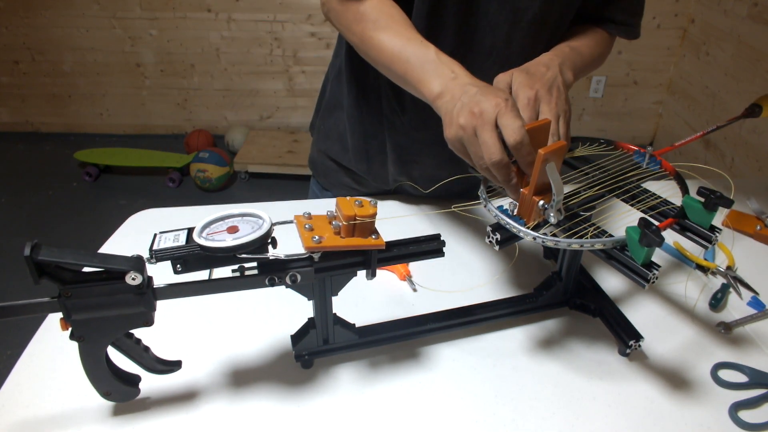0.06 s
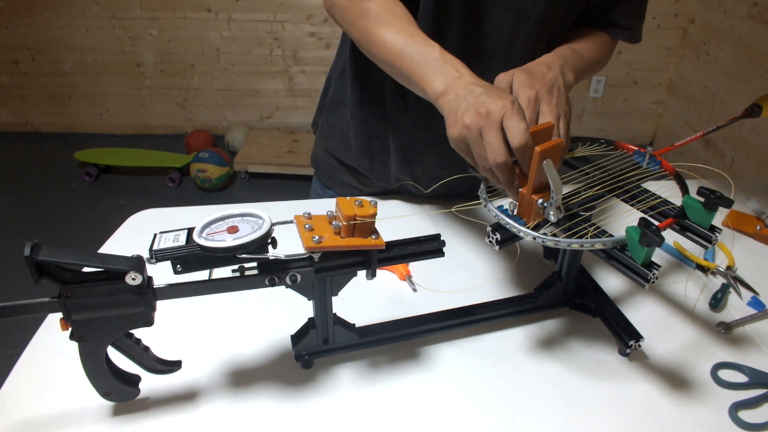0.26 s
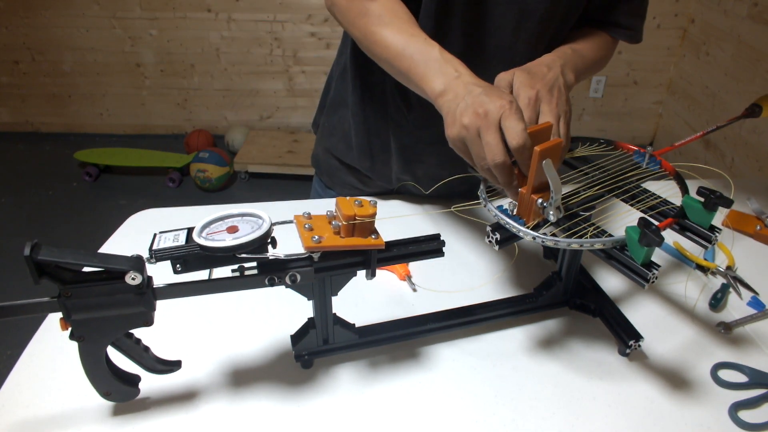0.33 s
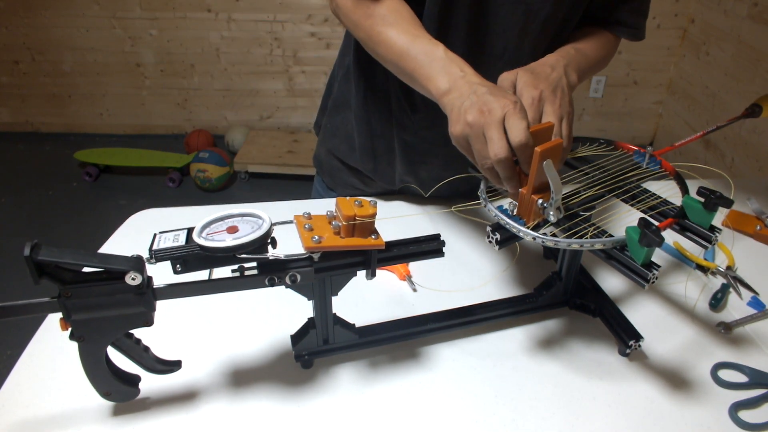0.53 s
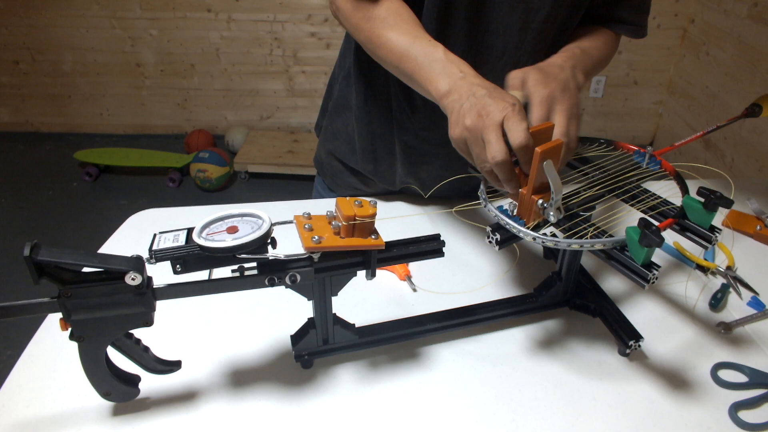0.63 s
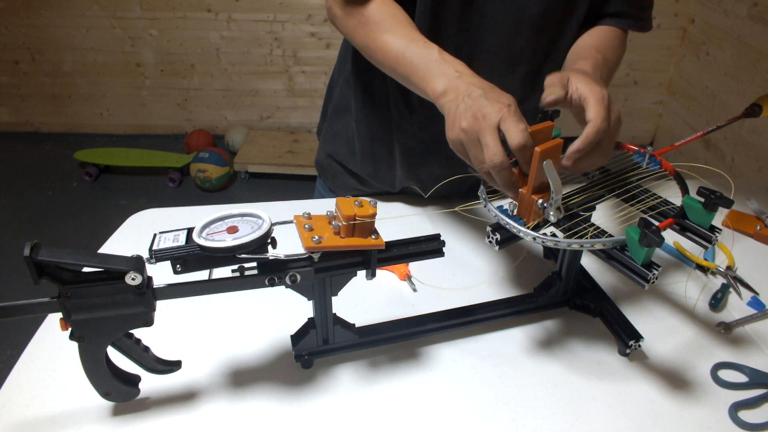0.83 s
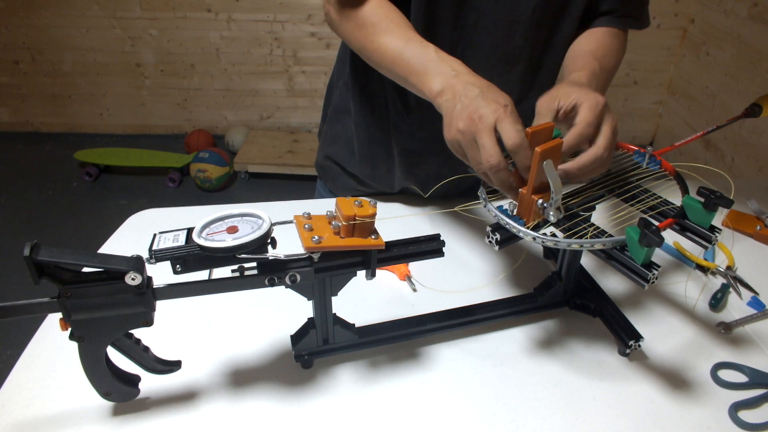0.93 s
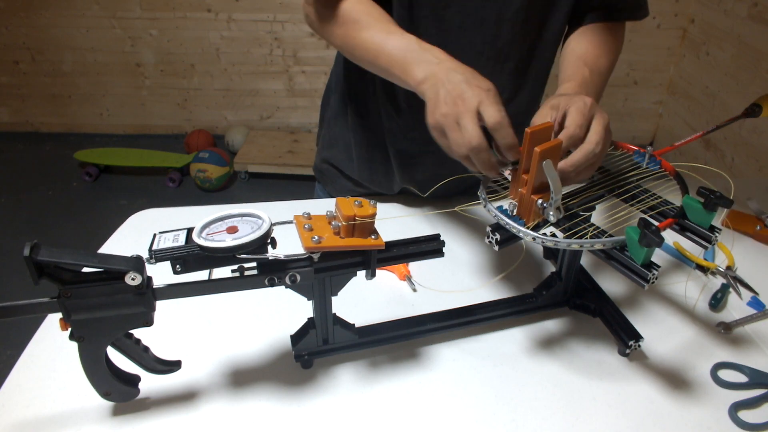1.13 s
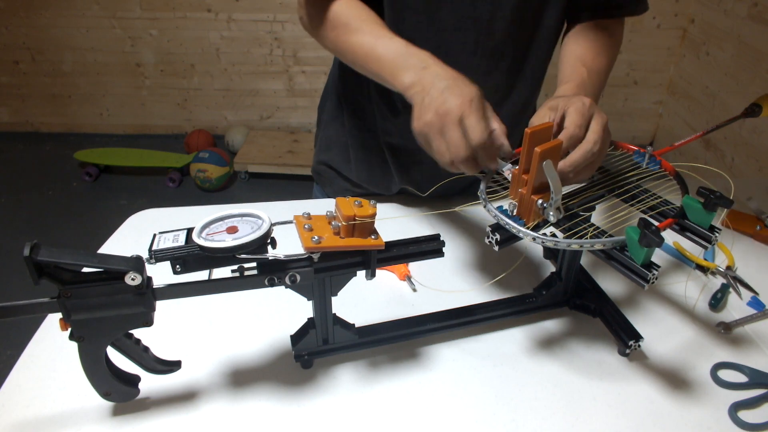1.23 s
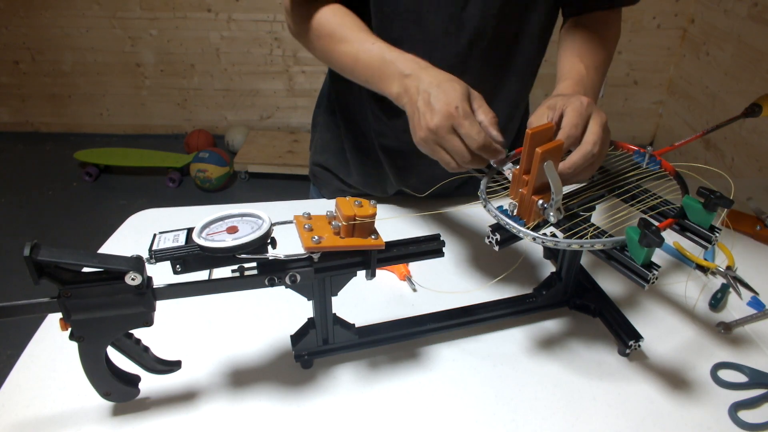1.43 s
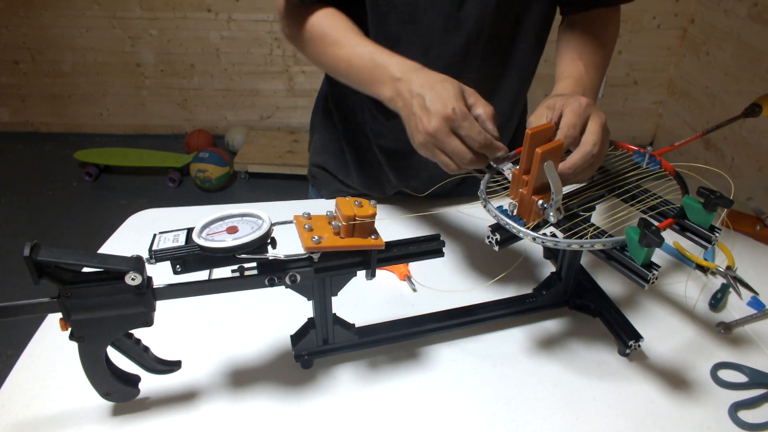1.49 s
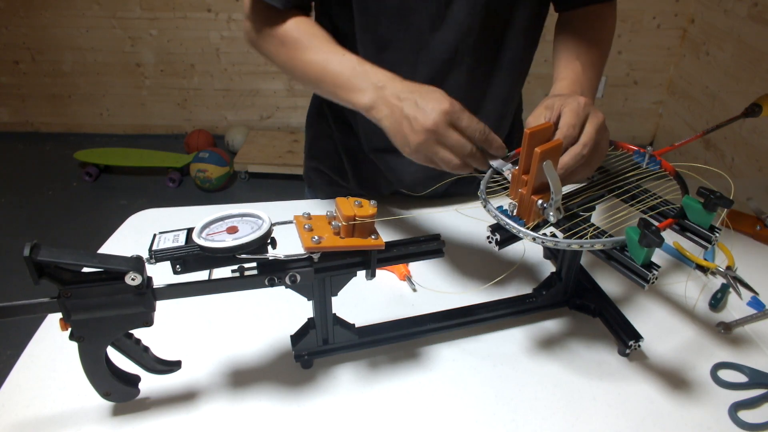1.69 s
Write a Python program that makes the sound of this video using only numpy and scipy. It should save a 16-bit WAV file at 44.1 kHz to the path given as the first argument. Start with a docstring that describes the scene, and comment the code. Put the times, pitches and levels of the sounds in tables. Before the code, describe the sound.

A metal clamp on a racket stringing machine ticks, then snaps over with a loud clack at about 0.2 seconds, leaving a brief low boom and thin ring. Fingers rustle faintly on the strings. From 1 second come light clicks and soft hand bumps, with a sharper click at 1.4 seconds and more dull bumps near 1.6. The sound is close, in a quiet, bare room.

```python
"""A quiet, bare room, with a close-set pair of microphones on a racket stringing machine.
The catch of a metal string clamp ticks, slightly to the right; then the clamp snaps over with a
loud clack that shakes the frame and table. Fingers rustle on the strings, hands bump the frame
softly, and the jaws click as the clamp is set again. Struck metal is damped modes plus a crack
of noise; rubbing is swells of noise. Low room tone lies under it all."""
import sys
import numpy as np
from scipy import signal
from scipy.fft import rfft, irfft, next_fast_len
from scipy.io import wavfile
from scipy.ndimage import uniform_filter1d

SR = 44100
rng = np.random.default_rng(int(sys.argv[2]) if len(sys.argv) > 2 else 0)


def inscribe(sig):
    """Save sig as 16-bit PCM at rate SR to the path in sys.argv[1].

    A 1-D sig is mono; a 2-D sig holds one channel per row.
    Samples are clipped to [-1, 1] before scaling.
    """
    pcm = np.round(np.clip(np.atleast_2d(sig).T, -1, 1) * 32767)
    wavfile.write(sys.argv[1], SR, pcm.astype(np.int16))


N = 77175


def amp(db):
    """Decibels to gain."""
    return 10 ** (np.asarray(db) / 20)

def unit(x):
    """Scale to rms 1."""
    return x / np.sqrt(np.mean(x ** 2) + 1e-20)

def along(points, hz):
    """A curve of (f/Hz, value) points, read on a log frequency axis."""
    freqs, values = np.transpose(points)
    return np.interp(np.log(hz + 1), np.log(freqs + 1), values)

def filtered(x, response):
    """Pass x through a complex frequency response."""
    size = next_fast_len(2 * N)
    return irfft(rfft(x, size) * response(np.fft.rfftfreq(size, 1 / SR)), size)[..., :N]

def noise(spectrum):
    """Coloured noise of rms 1."""
    return unit(filtered(rng.standard_normal(N), lambda hz: amp(along(spectrum, hz))))

def since(s):
    """Seconds since a moment, zero before it."""
    return np.maximum(np.arange(N) / SR - s, 0)

def struck(s, rise, t60):
    """Envelope of a blow: quick rise, exponential fall."""
    t = since(s)
    return (1 - np.exp(-t / rise)) * np.exp(-np.log(1000) * t / t60)

def ring(s, modes, rise):
    """Damped modes set going by one blow."""
    t = since(s)
    return sum(amp(db) * struck(s, rise, t60) * np.sin(2 * np.pi * hz * t) for hz, db, t60 in modes)

def burst(spectrum, s, rise, t60):
    """The noisy crack of a contact, with the energy of its envelope."""
    envelope = struck(s, rise, t60)
    crack = noise(spectrum) * envelope
    return crack * np.linalg.norm(envelope) / np.linalg.norm(crack)

def swells(strokes):
    """A bell-shaped rise and fall for each stroke."""
    return sum(amp(db) * np.exp(-((since(0) - s) / half) ** 2) for s, half, db in strokes)


# how alike the room sounds at the two microphones (f/Hz, correlation)
COHERENCE = [(30, 0.32), (100, 0.49), (300, 0.65), (600, 0.54), (1200, 0.27), (2500, 0.18), (5000, 0.059),
             (12000, 0.033)]

def diffuse(pair):
    """Two unrelated signals as the close-set pair hears them: more alike at low frequencies."""
    angle = lambda hz: np.arccos(np.clip(along(COHERENCE, hz), -1, 1)) / 2
    mid, side = filtered(pair, lambda hz: np.array([np.cos(angle(hz)), np.sin(angle(hz))]))
    return np.array([mid + side, mid - side])

ROOM_DECAY = [(80, 0.17), (250, 0.86), (700, 0.86), (2500, 0.68), (5000, 0.81), (9000, 0.48),
              (16000, 0.088)]  # reverberation of the bare walls (f/Hz, t60/s)
ROOM_COLOUR = [(80, 10), (200, 6), (600, 1.5), (1500, -4.5), (2600, -7.5), (5000, -7.5), (12000, -4.5)]  # spectrum of that tail (f/Hz, level/dB)
BALANCE = [(100, 0.5), (700, .5), (1400, -5.5), (2500, -7), (4500, -2.5), (12000, -3)]  # left microphone minus right (f/Hz, level/dB)
RIGHT_EARLIER = [(500, 0.000032), (2500, 0.000044), (7000, 0.000032), (14000, .00002)]  # head start at the right microphone (f/Hz, t/s)

def in_room(x, wet_db):
    """Direct sound from a spot nearer the right microphone, then the room's tail."""
    hz, t, spectra = signal.stft(rng.standard_normal((2, SR)), SR, nperseg=256)
    decay = np.exp(-np.log(1000) * t / along(ROOM_DECAY, hz)[:, None])
    tail = signal.istft(spectra * decay, SR, nperseg=256)[1][:, :SR]
    tail *= 1 - np.exp(-np.arange(SR) / SR / 0.005)  # reflections build over 5 ms
    tail = filtered(tail / np.linalg.norm(tail[0]), lambda f: amp(along(ROOM_COLOUR, f)))
    wet = diffuse(signal.fftconvolve(x[None], tail, axes=1)[:, :N])
    sides = np.array([[.5], [-.5]])  # left, right
    delay = lambda f: np.exp(-2j * np.pi * f * sides * along(RIGHT_EARLIER, f))
    direct = filtered(x, lambda f: amp(sides * along(BALANCE, f)) * delay(f))
    return direct + amp(wet_db) * wet


# background of the quiet room (f/Hz, level/dB)
ROOM_TONE_SPECTRUM = [(25, -32), (60, -14.5), (100, -12.5), (148, -9.5), (200, -7.5), (400, -10),
                      (750, -11.5), (900, -16.5), (2000, -18.5), (3500, -21.5), (15500, -37.5)]

def room_tone():
    """Steady low background, reaching the microphones from all round."""
    pair = np.array([noise(ROOM_TONE_SPECTRUM), noise(ROOM_TONE_SPECTRUM)])
    return amp(-54) * unit(diffuse(pair))


CATCH_TICKS = [(0.021, -51.5), (0.0706, -45), (0.2075, -29), (1.023, -54), (1.066, -47), (1.078, -50),
               (1.178, -56), (1.403, -40)]  # contacts of the catch (t/s, level/dB)
CATCH_SPECTRUM = [(100, 1), (800, -19), (2000, -6), (3200, -7), (4800, -8), (6400, -4), (8000, -2.5),
                  (11000, -19), (16000, -20)]  # their noise (f/Hz, level/dB)
CATCH_MODES = [(4100, -18, .06), (5890, -25.5, .025), (6635, 0, 0.013), (6800, -14, 0.046)]  # ring of the catch (f/Hz, level/dB, t60/s)

def catch():
    """Bright, sharp ticks of steel on steel."""
    ticks = 0
    for s, db in CATCH_TICKS:
        crack = burst(CATCH_SPECTRUM, s, rise=0.0001, t60=0.018)
        metal = amp(-1) * ring(s, CATCH_MODES, rise=0.00016)
        ticks += amp(db) * (crack + metal)
    return in_room(ticks, wet_db=-2)


HAND_BUMPS = [(0.066, -60, .006, 218), (.52, -56, 0.0065, 219), (1.012, -53, 0.0031, 244),
              (1.141, -43.5, 0.017, 197.2), (1.541, -51, 0.0054, 235), (1.615, -44, 0.01, 199),
              (1.70, -45, .015, 221)]  # hands on the frame (t/s, level/dB, rise/s, f/Hz of the frame's note)
THUD_SPECTRUM = [(30, -35), (120, -31), (190, 2), (250, -1), (320, -22.5), (550, -12), (900, -20),
                 (2500, -27), (16000, -63)]  # noise of a bump (f/Hz, level/dB)

def bumps():
    """Hands knock the frame: dull, rough thuds, each with a short low note."""
    thuds = 0
    for s, db, rise, hz in HAND_BUMPS:
        note = amp(-1) * np.sin(2 * np.pi * hz * since(s))
        thud = amp(2) * noise(THUD_SPECTRUM)
        thuds += amp(db) * struck(s, rise, t60=0.19) * (note + thud)
    return in_room(thuds, wet_db=-10)


JAW_CLICKS = [(0.07, -45.5), (1.014, -48), (1.069, -45), (1.078, -47.5), (1.404, -31), (1.480, -43.5),
              (1.717, -47)]  # contacts of the jaws (t/s, level/dB)
JAW_MODES = [(1330, -5.5, 0.014), (2160, -19, 0.036), (2223, -12.5, 0.053), (2740, -6.5, 0.041),
             (2900, -2.5, 0.03), (3190, -0.5, 0.022), (3624, -6, 0.028), (4300, -3.5, 0.016)]  # their ring (f/Hz, level/dB, t60/s)
JAW_SPECTRUM = [(100, -40), (350, -31), (650, 1.5), (1300, -4), (1750, 1.5), (3200, 3.5), (5000, -7),
                (7000, -9), (11000, -42), (16000, -22)]  # their crack (f/Hz, level/dB)

def jaws():
    """The jaws click lightly and ring briefly, with plenty of room around them."""
    metal = sum(amp(db) * ring(s, JAW_MODES, rise=0.00048) for s, db in JAW_CLICKS)
    crack = sum(amp(db - 9.5) * burst(JAW_SPECTRUM, s, rise=0.00016, t60=0.036) for s, db in JAW_CLICKS)
    return in_room(metal, wet_db=2.5) + in_room(crack, wet_db=6.5)


STRING_SLIPS = [(0.07, 4180, -52), (.485, 2070, -48.5), (1.065, 4320, -53.5), (1.074, 2240, -53),
                (1.717, 3760, -51.5)]  # slips of a string (t/s, f/Hz, level/dB)

def creaks():
    """A slipping string creaks faintly in a narrow band of noise."""
    half_width_hz = 160
    slips = 0
    for s, hz, db in STRING_SLIPS:
        band = filtered(rng.standard_normal(N), lambda f: 1 / (1 + ((f - hz) / half_width_hz) ** 2))
        slips += amp(db) * unit(band) * struck(s, rise=0.00087, t60=0.08)
    return in_room(slips, wet_db=8)


# pushes that sway the table (t/s, level/dB, rise/s)
TABLE_PUSHES = [(0.081, -49.5, 0.032), (0.23, -35, 0.02), (1.628, -55.5, 0.0053)]

def table():
    """The table's lowest mode hums after each push, the same in both microphones."""
    hz, t60 = 82.1, 0.46
    return sum(ring(s, [(hz, db, t60)], rise) for s, db, rise in TABLE_PUSHES)


FINGER_RUBS = [(0.157, 0.033, -63), (0.666, 0.12, -66), (1.009, 0.022, -61.5), (1.10, 0.044, -62),
               (1.165, 0.03, -61), (1.383, 0.038, -60), (1.613, 0.015, -63), (1.735, 0.035, -66.5)]  # fingers on the strings (t/s at the peak, half length/s, level/dB)
RUB_SPECTRUM = [(200, -55), (1500, 3.5), (2500, 2.5), (4500, 7), (8000, 0.5), (15000, -17.5)]  # their rustle (f/Hz, level/dB)
STRING_SLIDES = [(.221, 0.0043, -43.5), (.775, 0.025, -62.5), (1.072, .016, -57)]  # string running through (t/s at the peak, half length/s, level/dB)
SLIDE_SPECTRUM = [(500, -20), (3000, 0), (4400, 1), (6000, -2), (9000, 2), (15500, -12)]  # its hiss (f/Hz, level/dB)

def strings():
    """Fingers rub the strings with a grainy rustle; string swishes through clamp and fingers."""
    flicker = unit(uniform_filter1d(rng.standard_normal(N), size=130))  # grains of about 3 ms
    rustle = swells(FINGER_RUBS) * unit(amp(3.5 * flicker) * noise(RUB_SPECTRUM))
    swish = swells(STRING_SLIDES) * noise(SLIDE_SPECTRUM)
    return in_room(rustle + swish, wet_db=1)


CLAMP_HITS = [(0.2247, -14.5), (0.2321, -33)]  # the snap and its rebound (t/s, level/dB)
CLAMP_MODES = [(1450, -13, 0.051), (1506, -12.5, .05), (1867, -11.5, 0.042), (1920, -5, 0.028),
               (2110, -13, 0.05), (2543, 0.5, 0.034), (2586, -0.5, 0.036), (3022, -4, 0.031),
               (3460, -11, 0.032), (3560, -12, .03), (4510, -10.5, 0.035)]  # ring of the clamp (f/Hz, level/dB, t60/s)
CLAMP_SPECTRUM = [(40, -31), (200, -2.5), (600, 2), (900, -4.5), (1500, 1.5), (3200, 4), (5000, -8.5),
                  (7500, -16), (11000, -26), (16000, -30)]  # crack of the impact (f/Hz, level/dB)

def clack():
    """The clamp snaps over: a loud crack and the short ring of its metal."""
    metal = sum(amp(db) * ring(s, CLAMP_MODES, rise=0.0022) for s, db in CLAMP_HITS)
    crack = sum(amp(db - 4.5) * burst(CLAMP_SPECTRUM, s, rise=0.00035, t60=0.037)
                for s, db in CLAMP_HITS)
    return in_room(metal, wet_db=-2) + in_room(crack, wet_db=1)


FRAME_JOLTS = [(0.2263, -30.5), (1.406, -57)]  # jolts from the clamp (t/s, level/dB)
FRAME_MODES = [(162.3, -13, 0.52), (186.6, 2.5, 0.14), (224.5, -5.5, 0.23), (293.1, -10, 0.64),
               (408, -10, 0.34), (469, -11.5, 0.41), (497, -6, 0.19), (524.8, -8, 0.38), (569.5, -13, 0.53),
               (660.3, -5, 0.41), (698.3, 11, 0.082), (721, -3, .16)]  # boom of the frame (f/Hz, level/dB, t60/s)
STEEL_TONE = [(2525, -39, 0.63)]  # long ring of the steel (f/Hz, level/dB, t60/s)

def frame():
    """The frame booms under the clamp, close and dry; one thin steel tone sings on after the snap."""
    boom = sum(amp(db) * ring(s, FRAME_MODES, rise=0.0065) for s, db in FRAME_JOLTS)
    snap_s = CLAMP_HITS[0][0]
    sing = ring(snap_s, STEEL_TONE, rise=0.0015)
    return in_room(boom + sing, wet_db=-15.5)


def scene():
    """The machine and the room as they reach the pair."""
    return room_tone() + catch() + bumps() + jaws() + creaks() + table() + strings() + clack() + frame()

def record(dry):
    """The microphones thin the deepest bass; the recorder cuts off steeply at its band limit."""
    low_cut_hz, top_hz = 20.3, 16000
    thinned = filtered(dry, lambda hz: (1j * hz / (low_cut_hz + 1j * hz)) ** 2)
    return filtered(thinned, lambda hz: 1 / (1 + (hz / top_hz) ** 120))


dry = scene()
out = record(dry)
inscribe(out)
```